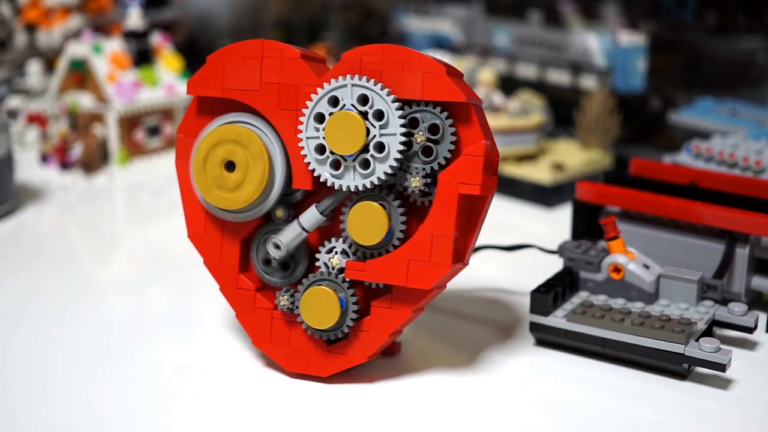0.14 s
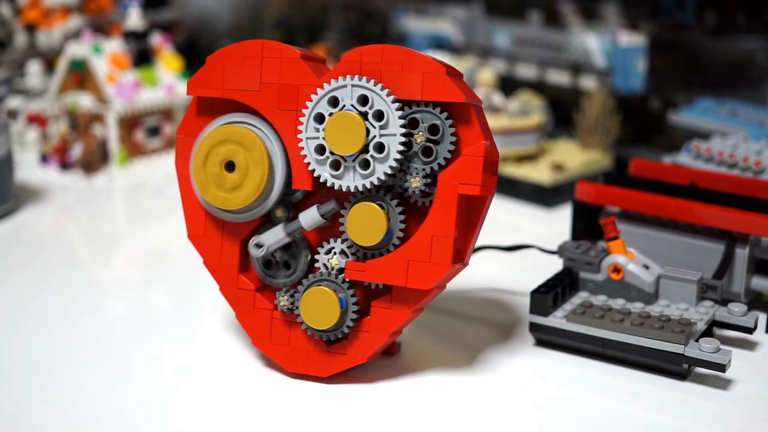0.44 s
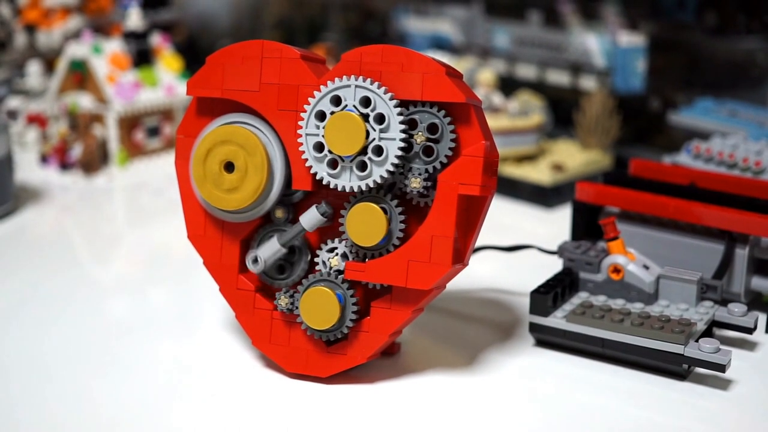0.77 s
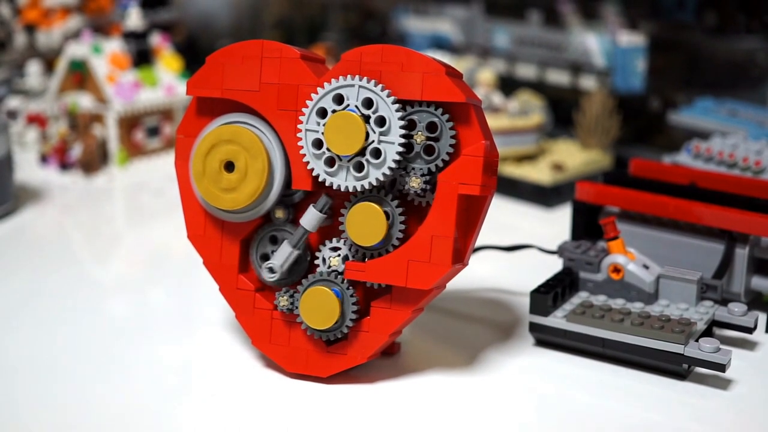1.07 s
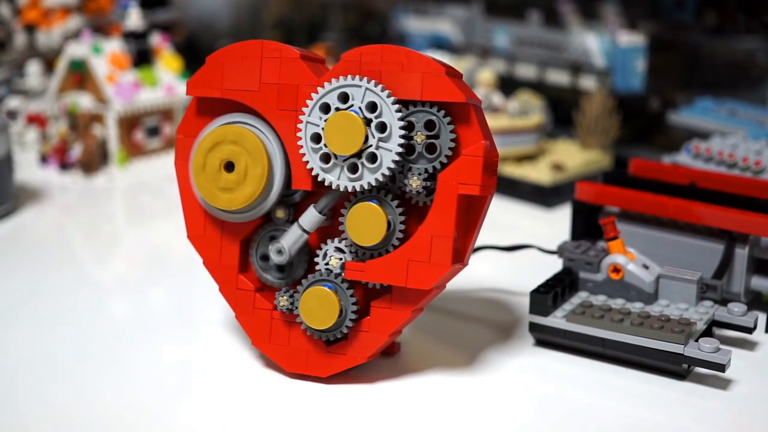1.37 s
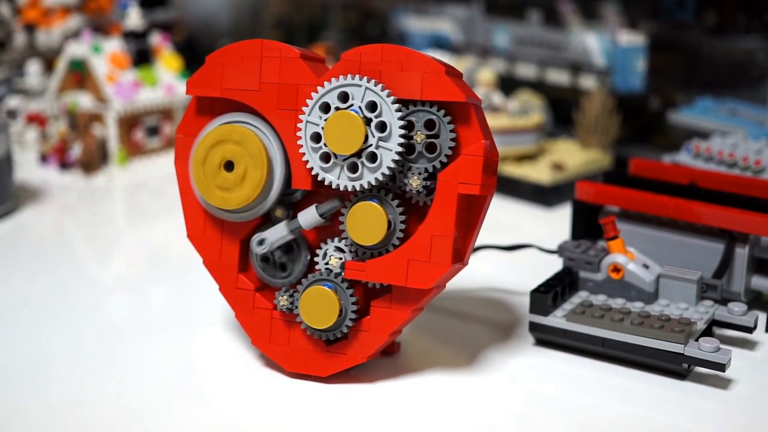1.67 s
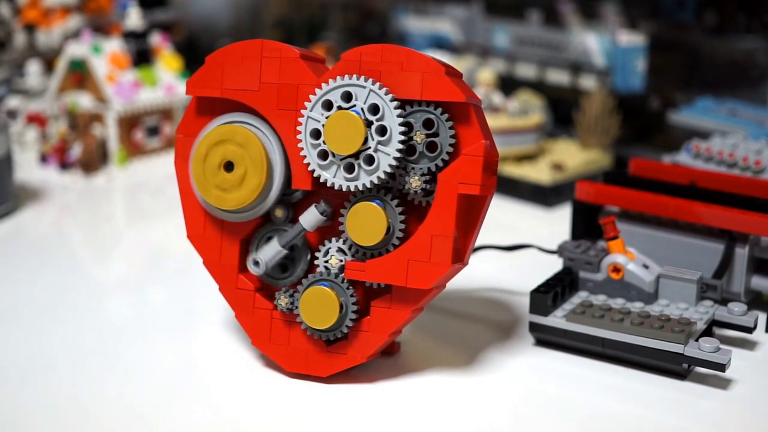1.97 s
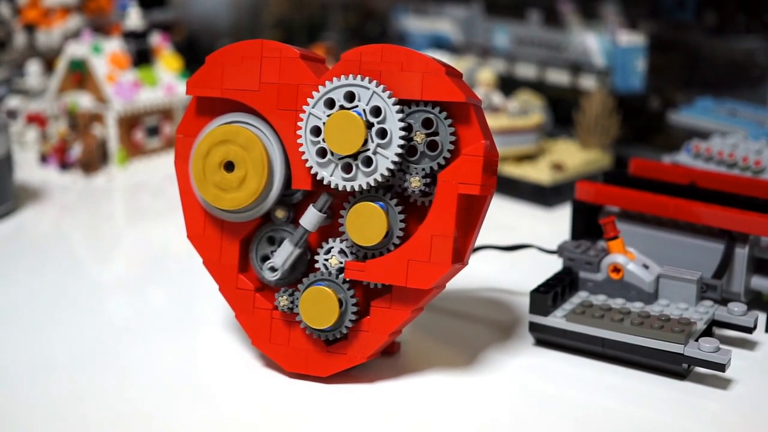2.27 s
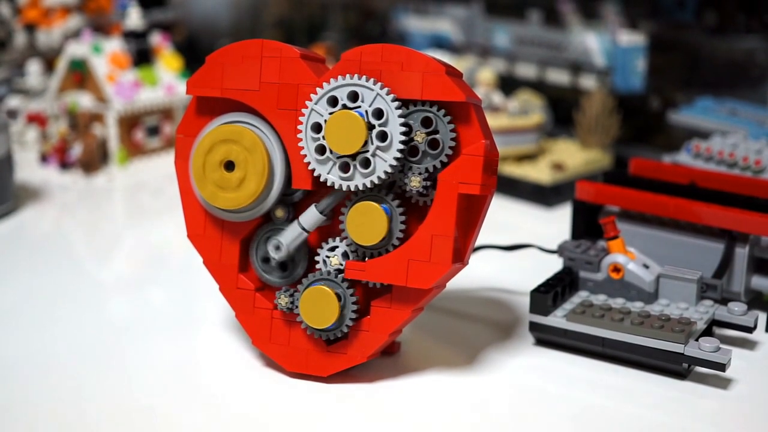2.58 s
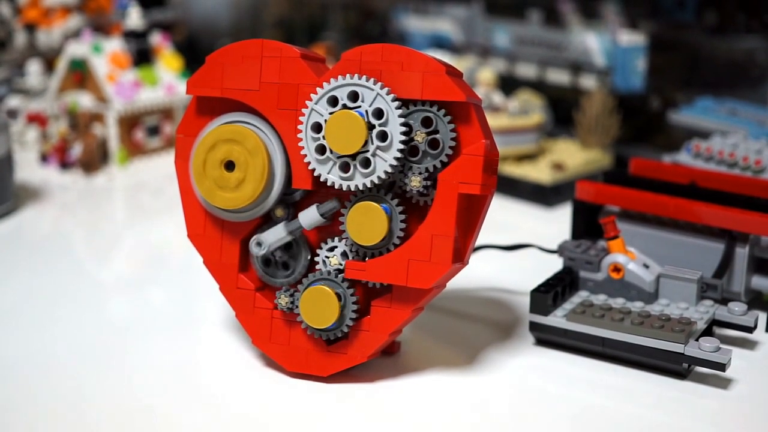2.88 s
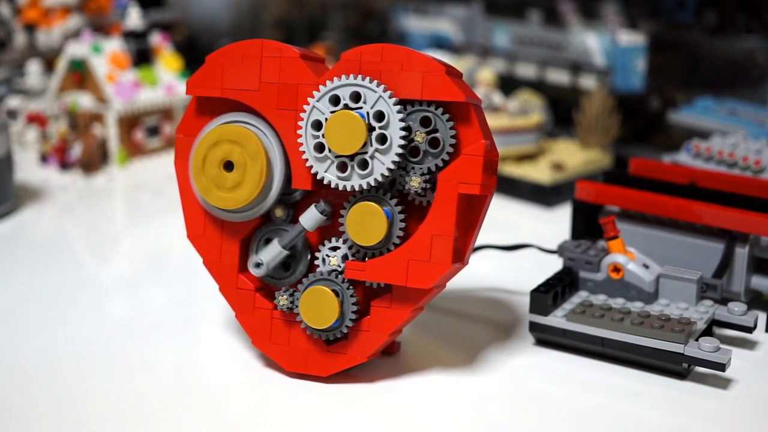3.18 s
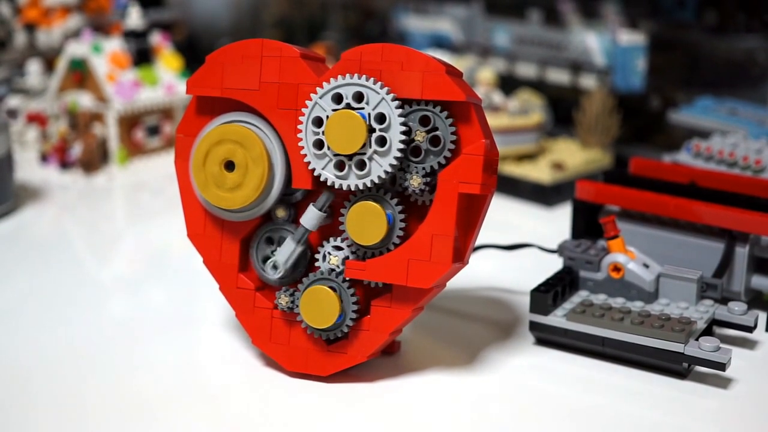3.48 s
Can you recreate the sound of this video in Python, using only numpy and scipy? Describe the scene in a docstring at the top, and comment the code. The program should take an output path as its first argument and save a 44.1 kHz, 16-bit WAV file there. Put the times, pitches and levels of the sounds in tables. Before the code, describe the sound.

Plastic gears in a hollow brick-built model whirr continuously, driven by a small electric motor. Rattle swells about ten times a second, with sharp irregular ticks over a faint hum; close stereo microphone, small dry room.

```python
"""A small electric motor hums and whines, its tones locked to the shaft angle, while its brushes hiss.
It drives plastic gears and a crank in a brick-built model on a table, in a small room. Random tooth contacts
excite the hollow brick body as a dense patter; slack gears rattle in swells and tick as bouncing, ringing snaps.
The crank loads the motor once a turn. The table rumbles, thumps softly at its resonance as the model rocks,
and carries one dull knock of the frame."""
import sys
import numpy as np
from scipy.fft import rfft, irfft
from scipy.io import wavfile

SR = 44100
rng = np.random.default_rng(int(sys.argv[2]) if len(sys.argv) > 2 else 0)


def file_out(sig):
    """Save sig as 16-bit WAV at sys.argv[1]."""
    # one column per channel
    cols = np.atleast_2d(sig).T
    # limit, then scale
    lim = np.clip(cols, -1, 1)
    pcm = np.round(lim * 32767).astype(np.int16)
    wavfile.write(sys.argv[1], SR, pcm)


N = 160524
T = np.arange(N) / SR
HZ = np.maximum(np.arange(N + 1) * SR / (2 * N), 1)  # bins of a transform padded to 2 N

# In every colour table below, density_db is relative: the coloured signal is then scaled to unit rms.

# Motor tones: [shaft_multiple, level_db, left_minus_right_db, flutter_rms_db (signed)]
MOTOR_TONES = [(1, -44, 1, 1.5), (2, -66, 3, 3), (3, -63, -1, 3), (9, -58, -15.5, 2), (14, -54, 2, 7.5),
               (35, -56, 4, -6), (51, -52.5, 4.5, 2.5), (54, -55.5, 6, -4), (60, -48.5, 2.5, 2)]
MOTOR_HZ, SPEED_WANDER_HZ = 178.8, 0.2
CRANK_TURN_S, CRANK_LOAD_AT_S = 0.412, 0.097  # period, and a moment of greatest load
CRANK_SAG_HZ, CRANK_LOAD_DB = 0.22, 1

# Colour of the brush hiss: [frequency_hz, density_db]
BRUSH_COLOUR = [(8500, -36), (9900, -5), (10400, -8), (10600, 7), (10760, 3.5), (10850, 1.5), (11000, 0.5),
                (11600, -30)]
BRUSH_DB, BRUSH_PAN_DB, BRUSH_FLUTTER_DB = -38.5, 5, 2.5

# Colour of the gear-tooth patter: [frequency_hz, density_db]
TEETH_COLOUR = [(250, -16.5), (480, -7.5), (640, -19), (820, -18), (1020, -4.5), (1200, -9.5), (1430, -4.5),
                (1780, -7), (2500, 0), (2950, -1), (3900, -0.5), (4500, -3.5), (5600, -1.5), (6400, -0.5),
                (7300, -3), (9000, 0), (11000, -5)]
TEETH_PER_S, TEETH_SPREAD_DB, TEETH_DB, TEETH_FLUTTER_DB = 9000, 2, -32.5, 1.35

# Resonances of the hollow brick body: [frequency_hz, width_hz, lift_db]
BODY_RESONANCES = [(450, 37, 2), (496, 20, 4.5), (1411, 55, 4), (1967, 89, 7), (2476, 190, 2.5),
                   (2880, 34, 3.5), (3330, 68, 5.5), (4160, 150, 4.5), (4926, 100, 4.5), (6290, 160, 3),
                   (6500, 70, 2), (7830, 85, 5.5), (8400, 60, -3.5), (9950, 88, 1.5)]

# Colour of the rumble of table top and room: [frequency_hz, density_db]
RUMBLE_COLOUR = [(20, -41), (45, -31), (58, -8), (72, -22), (92, -16.5), (122, 1.5), (150, -4.5),
                 (170, -14), (210, -8), (300, -12), (420, -19.5), (700, -18), (2000, -36)]
RUMBLE_DB, RUMBLE_FLUTTER_DB = -50.5, 1.5

# Swells of the slack gears: [centre_s, low_level_db, bright_level_db], levels before the two offsets below
RATTLE_SWELLS = [(0.014, -50, -28.5), (0.127, -39.5, -36), (0.204, -42.5, -39), (0.339, -50, -34),
                 (0.422, -46.5, -32), (0.522, -41, -38), (0.613, -39, -35), (0.737, -46, -31),
                 (0.836, -62, -35), (0.936, -40, -37), (1.015, -43, -31), (1.149, -49, -35),
                 (1.23, -47, -31), (1.306, -41.5, -35), (1.424, -42.5, -44), (1.494, -45, -41),
                 (1.662, -55, -37), (1.744, -40, -34), (1.834, -40, -32), (2.08, -43.5, -30),
                 (2.148, -42, -37), (2.213, -39.5, -41), (2.36, -44, -31), (2.449, -48, -33.5),
                 (2.55, -40.5, -41), (2.642, -39.5, -29.5), (2.758, -48, -31), (2.846, -48, -32.5),
                 (2.96, -39, -33.5), (3.04, -41, -36), (3.165, -42, -32), (3.29, -43, -30),
                 (3.365, -40.5, -35), (3.435, -37.5, -32), (3.569, -42, -33)]
RATTLE_WIDTH_S, RATTLE_PER_S, RATTLE_SPREAD_DB = 0.017, 3000, 2.5
LOW_CLATTER_DB, BRIGHT_CLATTER_DB = -1.4, -4

# Colour of the low clatter: [frequency_hz, density_db]
LOW_COLOUR = [(200, -8), (380, -13), (490, 1), (620, -15.5), (800, -12), (1030, 1), (1220, -6), (1420, 2.5),
              (2000, -3), (2800, -6.5), (6000, -40)]

# Colour of the bright clatter and of the crack of a tick: [frequency_hz, density_db]
BRIGHT_COLOUR = [(1200, -39), (2000, -8.5), (2500, -6), (3700, 2.5), (4700, -2), (6400, -2), (8000, -3.5),
                 (11000, -7)]

# Teeth snapping across their play: [start_s, level_db (before the ring and crack offsets), nominal_pitch_hz]
TICK_SNAPS = [(0.1264, -22, 2510), (0.2049, -26.5, 3180), (0.3244, -22, 3230), (0.4124, -24, 4000),
              (0.4964, -24, 3870), (0.6114, -37, 3480), (0.73, -28, 2500), (0.8141, -23.5, 2780),
              (0.84, -25, 3300), (0.932, -28, 3810), (1.0498, -24, 3380), (1.2226, -25, 3170),
              (1.3014, -24, 3590), (1.4925, -23, 2850), (1.6734, -29, 4260), (1.7275, -22, 6700),
              (1.82, -24, 2880), (1.8284, -26, 3300), (2.0323, -22.5, 3110), (2.1294, -24, 3300),
              (2.4366, -24, 3330), (2.595, -22, 2540), (2.6404, -22.5, 2420), (2.753, -25, 2450),
              (2.8423, -20, 2940), (2.9542, -22, 4150), (3.0023, -22, 2510), (3.031, -19.5, 2530),
              (3.2463, -19.5, 3890), (3.2906, -21.5, 4200), (3.3294, -21, 4070), (3.4236, -27, 3900)]
TICK_RING_DB, TICK_T60_S, TICK_CRACK_DB, TICK_CRACK_S = -5.5, 0.014, -4.5, 0.0017
BOUNCE_S, BOUNCE_LOSS_DB, BOUNCE_PITCH_SPREAD = 0.0035, 2.5, 0.05  # the pitch spread is a ratio

# Rocking of the model on the table: [start_s, level_db (before THUMP_DB)]
TABLE_THUMPS = [(.135, -39), (.54, -36), (1.354, -38.5), (1.65, -46), (1.753, -37), (1.981, -44),
                (2.181, -43.5), (2.39, -44), (2.801, -43), (2.967, -37.5), (3.194, -43), (3.265, -42.5),
                (3.372, -41)]
TABLE_HZ, THUMP_RISE_S, THUMP_DB = 120.2, 0.025, -2.0

# Colour of the frame's knock: [frequency_hz, density_db]
FRAME_COLOUR = [(180, -22), (280, -4), (345, 3), (400, -3.5), (560, -6.5), (930, -9.5), (1500, -22),
                (3000, -45)]
KNOCK_S, KNOCK_RISE_S, KNOCK_DB = 1.034, 0.023, -41.5

# Likeness of left and right: [frequency_hz, correlation (-1 to 1)]
STEREO_LIKENESS = [(60, .95), (150, .98), (350, .8), (650, .63), (1300, .68), (2300, .7), (3600, .48),
                   (6500, .36), (11000, .3)]

# Stereo balance of the sounds of the body: [frequency_hz, left_minus_right_db]
BODY_BALANCE = [(250, -2.5), (410, -4), (660, 9), (1070, 1.5), (1700, 1), (2600, -2.5), (3300, 1.5),
                (4600, 2.5), (5700, 3), (6800, 1.5), (10000, 0.5)]
RIGHT_LAG_S = 0.00003
ROOM_T60_S, ROOM_DB = 0.11, -8
CUTOFF_HZ = 11040


def from_db(db):
    """Amplitude gain is ten to the power of decibels over twenty."""
    return 10 ** (np.asarray(db) / 20)


def rms_one(x):
    """Dividing by the root mean square gives unit power."""
    return x / np.sqrt(np.mean(x ** 2) + 1e-20)


def curve(points):
    """A function of frequency is interpolated linearly on a logarithmic axis."""
    hz, value = np.transpose(points)
    return np.interp(np.log(HZ), np.log(hz), value)


def shape(x, gain):
    """Linear filtering is multiplication of the spectrum by a gain."""
    return irfft(rfft(x, 2 * N) * gain)[..., :N]


def pan(db):
    """A level difference is shared equally, with opposite signs, by left and right."""
    return from_db(np.array([[0.5], [-0.5]]) * db)


def drift(rate):
    """Low-passed white noise is a slow random motion, here of unit rms."""
    return rms_one(shape(rng.standard_normal(N), 1 / (1 + (HZ / rate) ** 2)))


def spread(pair):
    """Mid and side powers set the correlation of left and right; the right is delayed by a phase slope."""
    alike = np.clip(curve(STEREO_LIKENESS), -0.99, 0.99)
    mid, side = shape(pair, np.sqrt([1 + alike, 1 - alike]))
    lag = np.exp(-2j * np.pi * HZ * RIGHT_LAG_S)
    return np.array([mid + side, shape(mid - side, lag)])


def noise(colour):
    """White noise filtered to a given spectral density, in stereo, with unit rms."""
    white = rng.standard_normal((2, N))
    return rms_one(shape(spread(white), from_db(curve(colour))))


def contacts(per_s, spread_db):
    """Independent contacts form a random pulse train of uneven strength and either sign."""
    strengths = from_db(spread_db * np.minimum(rng.exponential(1, (2, N)), 5))
    hits = rng.random((2, N)) < per_s / SR
    return hits * strengths * rng.choice([-1, 1], (2, N))


def body(excitation, colour):
    """A hollow body filters its excitation through resonance peaks and dips; unit rms."""
    lift_db = sum(db / (1 + (2 * (HZ - hz) / width) ** 2) for hz, width, db in BODY_RESONANCES)
    gain = from_db(curve(colour) + lift_db)
    return rms_one(shape(spread(excitation), gain * pan(curve(BODY_BALANCE))))


def mode(start, hz, t60):
    """A struck mode is a sinusoid with exponential decay, its envelope starting at 1."""
    out = np.zeros(N)
    span = slice(int(start * SR) + 1, int((start + 2 * t60) * SR))
    age = T[span] - start
    out[span] = np.sin(2 * np.pi * hz * age) * from_db(-60 * age / t60)
    return out


def swell(start, rise):
    """A critically damped response, squared, rises softly and falls more slowly; peak 1."""
    age = np.clip((T - start) / rise, 0, 20)
    return (age * np.exp(1 - age)) ** 2


def motor(angle):
    """Rotation makes harmonics locked to the shaft angle, each fluttering in level."""
    tones = np.zeros((2, N))
    for multiple, db, side_db, flutter_db in MOTOR_TONES:
        wave = np.sin(round(multiple) * angle + rng.uniform(0, 2 * np.pi))
        flutter = from_db(flutter_db * drift(5.9))
        tones += pan(side_db) * from_db(db) * rms_one(flutter * wave)
    return tones


def brushes():
    """Sliding brushes make narrow-band noise, sputtering by random modulation."""
    hiss = noise(BRUSH_COLOUR) * from_db(BRUSH_FLUTTER_DB * drift(63))
    return from_db(BRUSH_DB) * pan(BRUSH_PAN_DB) * rms_one(hiss)


def teeth(load):
    """Dense random tooth contacts drive the body, harder as the crank load grows."""
    clicks = contacts(TEETH_PER_S, TEETH_SPREAD_DB) * from_db(TEETH_FLUTTER_DB * drift(99))
    return from_db(TEETH_DB + CRANK_LOAD_DB * load) * body(clicks, TEETH_COLOUR)


def rumble():
    """The table top and room give low-frequency noise of slowly varying level."""
    return from_db(RUMBLE_DB + RUMBLE_FLUTTER_DB * drift(12)) * noise(RUMBLE_COLOUR)


def rattles():
    """Play in the gears gives Gaussian bursts of sparser contacts in a low and a bright range."""
    centre, low_db, bright_db = np.transpose(RATTLE_SWELLS)
    swells = np.exp(-0.5 * np.minimum(((T - centre[:, None]) / RATTLE_WIDTH_S) ** 2, 20))

    def clatter(db, colour):
        """Burst envelopes modulate contacts heard through the body."""
        return from_db(db) @ swells * body(contacts(RATTLE_PER_S, RATTLE_SPREAD_DB), colour)

    low = clatter(low_db + LOW_CLATTER_DB, LOW_COLOUR)
    return low + clatter(bright_db + BRIGHT_CLATTER_DB, BRIGHT_COLOUR)


def ticks(count=4):
    """Impact gives a brief noisy crack; successive weaker bounces ring a mode of the struck part."""
    rings, cracks = np.zeros(N), np.zeros(N)
    for start, db, hz in TICK_SNAPS:
        gaps = BOUNCE_S * rng.uniform(0.5, 1.5, count)
        bends = np.exp(BOUNCE_PITCH_SPREAD * rng.standard_normal(count))
        for k in range(count):
            ring = mode(start + gaps[:k].sum(), hz * bends[k], TICK_T60_S)
            rings += from_db(db - BOUNCE_LOSS_DB * k) * ring
        decay = np.exp(-np.clip((T - start) / TICK_CRACK_S, 0, 20))
        cracks += from_db(db) * (T >= start) * decay
    crack_noise = body(rng.standard_normal((2, N)), BRIGHT_COLOUR)
    return from_db(TICK_RING_DB) * rings + from_db(TICK_CRACK_DB) * cracks * crack_noise


def thumps():
    """Rocking excites the table top's resonance in soft swells."""
    return sum(from_db(db + THUMP_DB) * swell(start, THUMP_RISE_S) * np.sin(2 * np.pi * TABLE_HZ * (T - start))
               for start, db in TABLE_THUMPS)


def knock():
    """One shift of the frame is a dull burst of coloured noise."""
    return from_db(KNOCK_DB) * swell(KNOCK_S, KNOCK_RISE_S) * noise(FRAME_COLOUR)


def room(x):
    """Diffuse reverberation is convolution with decaying noise, independent on each side."""
    tail = rng.standard_normal((2, N)) * from_db(-60 * np.minimum(T / ROOM_T60_S, 2))
    return shape(x, rfft(rms_one(tail), 2 * N) / np.sqrt(N))


def scene():
    """A periodic crank load lowers the shaft rate slightly and raises the tooth force."""
    load = np.cos(2 * np.pi * (T - CRANK_LOAD_AT_S) / CRANK_TURN_S)
    shaft_hz = MOTOR_HZ - CRANK_SAG_HZ * load + SPEED_WANDER_HZ * drift(10.24)
    angle = 2 * np.pi * np.cumsum(shaft_hz) / SR
    works = brushes() + teeth(load) + rattles() + ticks()
    table = rumble() + thumps() + knock()
    return motor(angle) + works + from_db(ROOM_DB) * room(works) + table


def record(dry):
    """A very steep low-pass filter removes the top of the spectrum."""
    return shape(dry, 1 / np.sqrt(1 + (HZ / CUTOFF_HZ) ** 800))


dry = scene()
out = record(dry)
file_out(out)
```